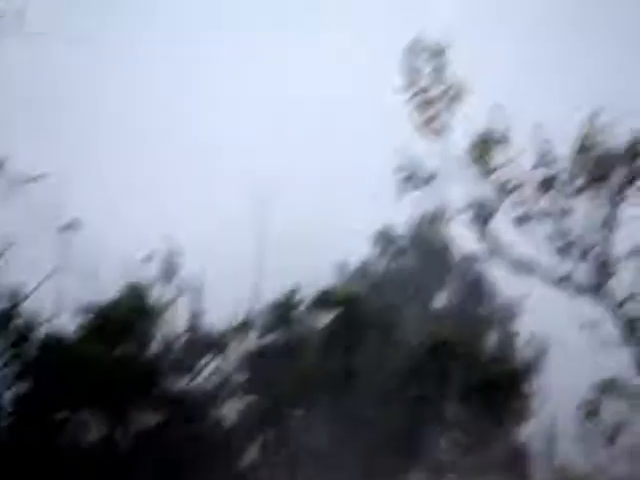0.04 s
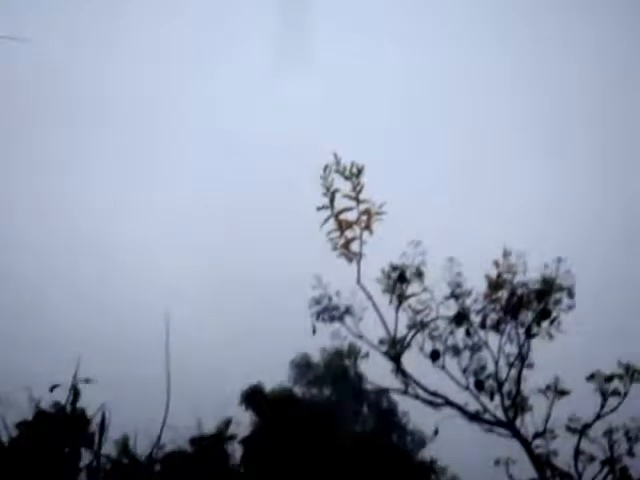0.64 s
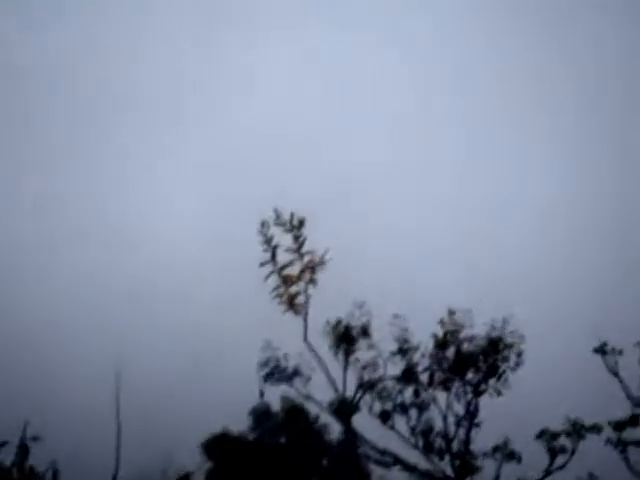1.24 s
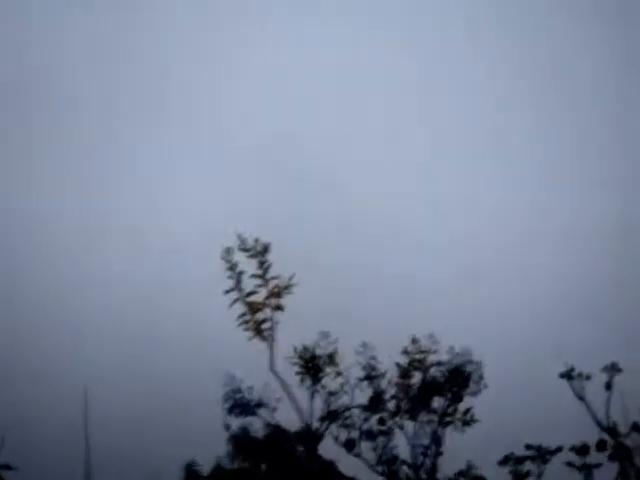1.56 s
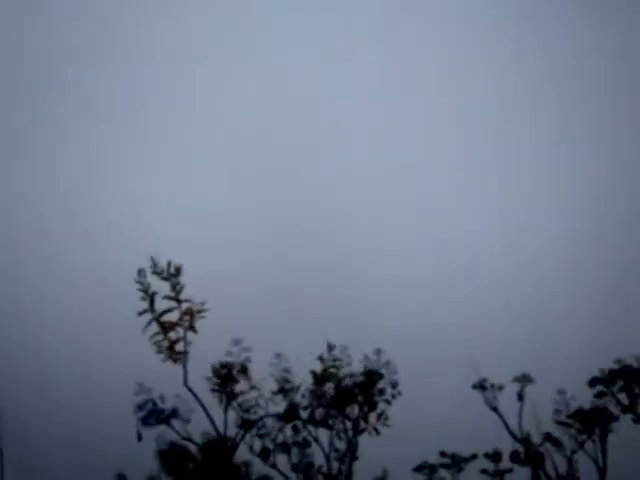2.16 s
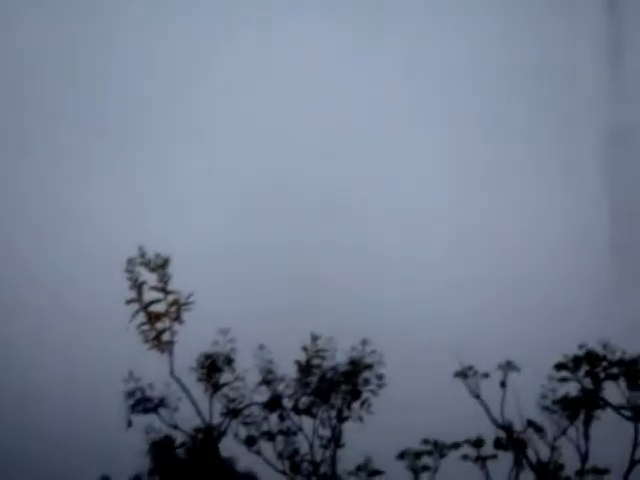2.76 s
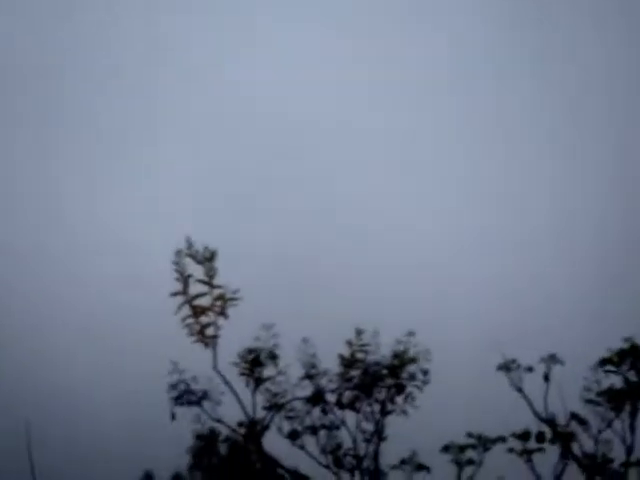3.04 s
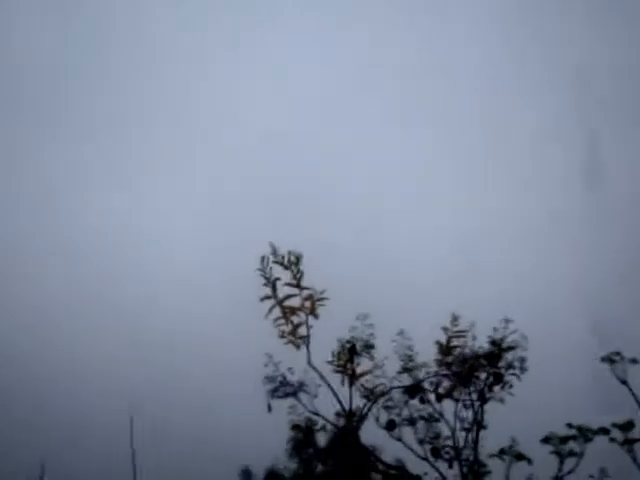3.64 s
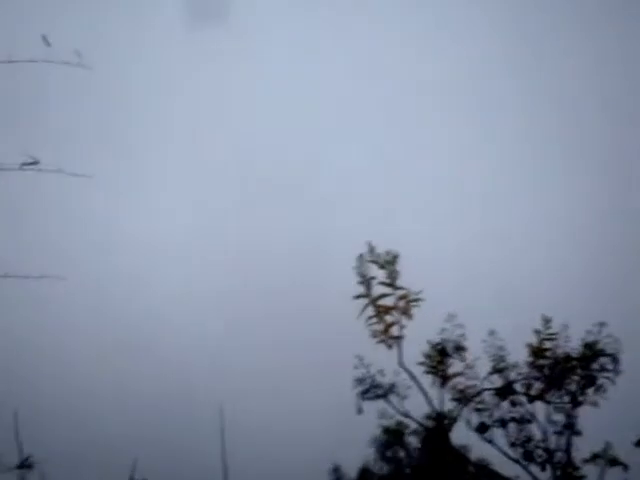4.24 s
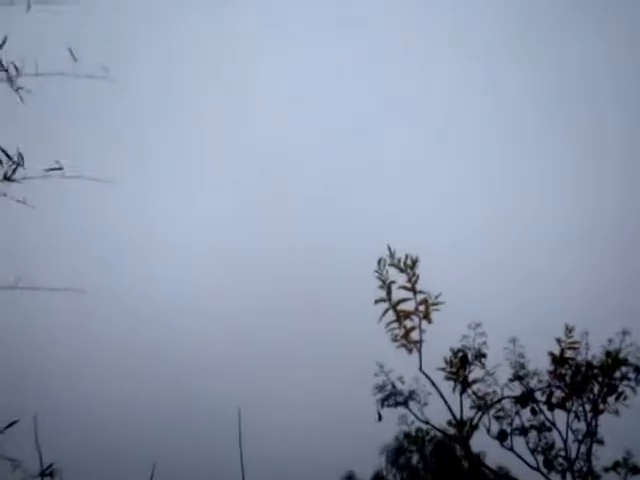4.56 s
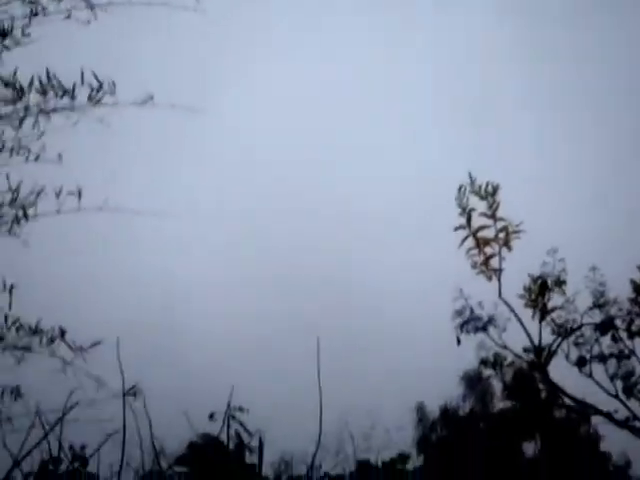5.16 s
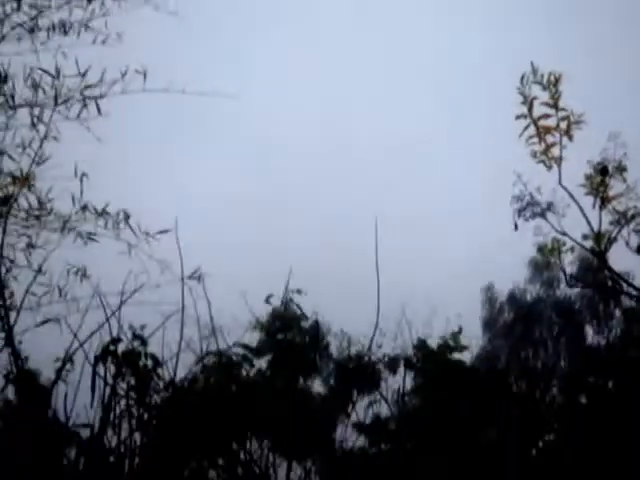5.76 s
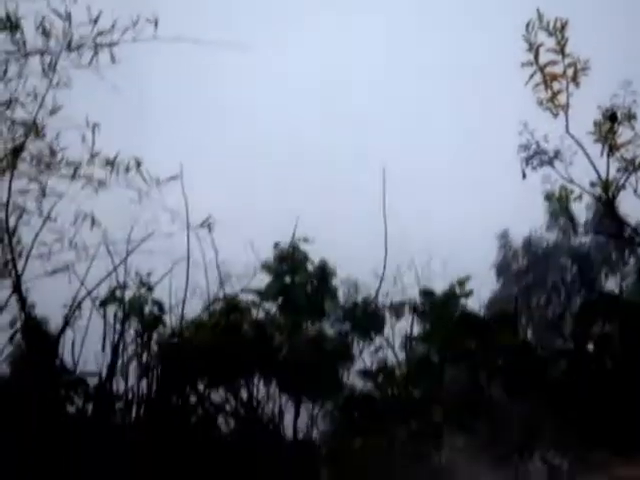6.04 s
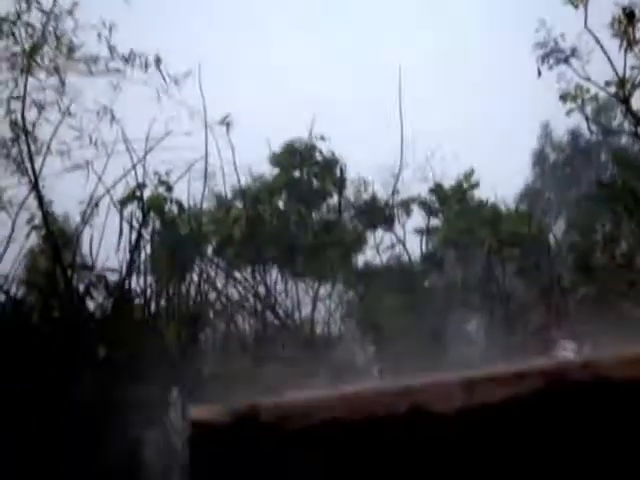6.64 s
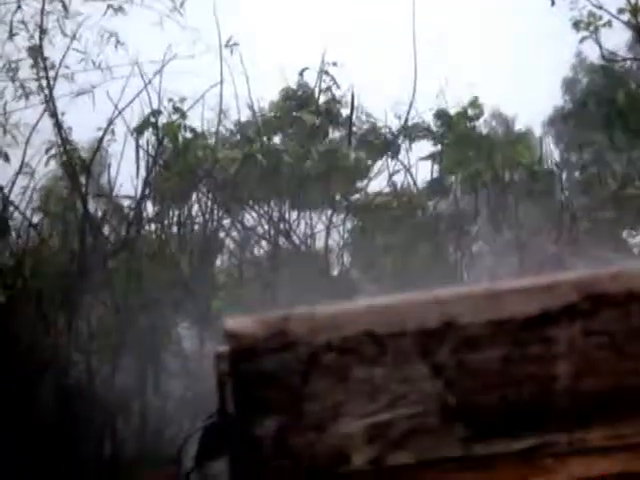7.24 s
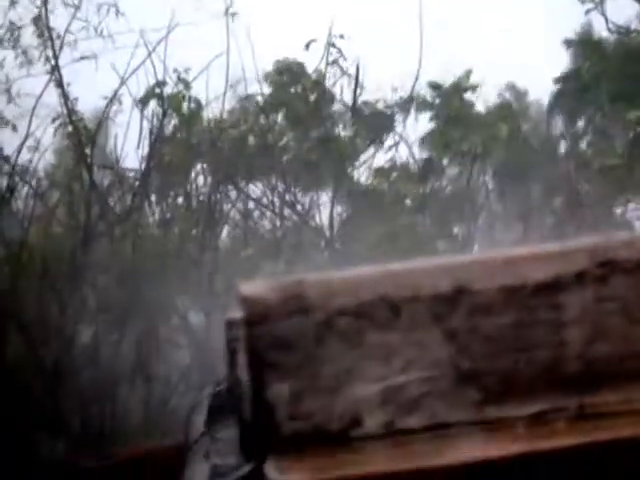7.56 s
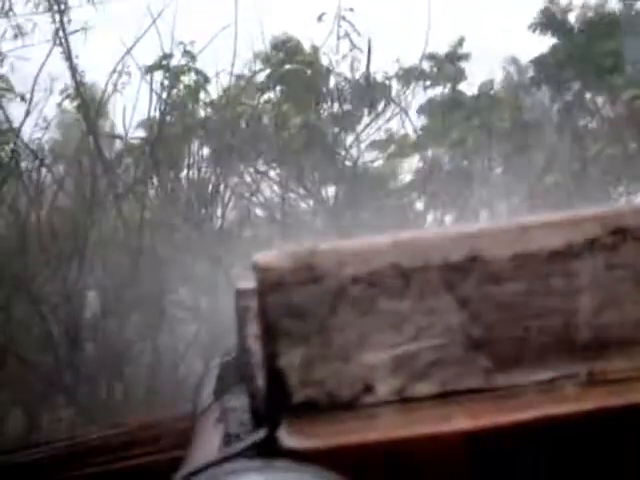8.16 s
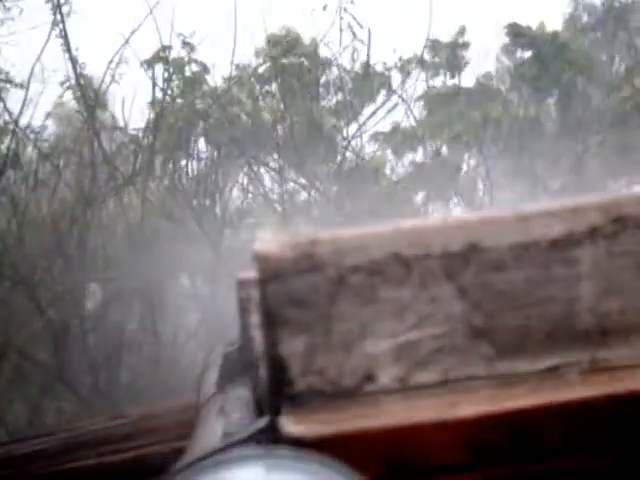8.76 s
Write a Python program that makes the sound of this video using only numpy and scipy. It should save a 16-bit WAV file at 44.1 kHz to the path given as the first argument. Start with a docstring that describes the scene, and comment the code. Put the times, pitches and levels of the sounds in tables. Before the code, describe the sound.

Heavy rain drums on a roof overhead, with close drips spattering on stone and a low rumble like distant thunder.

```python
"""Under the edge of a roof, in a heavy downpour. Thousands of drops drum on the roofing, with brief
low thuds standing out, while water spatters and drips on the masonry close by and clinks on a tile.
A low rumble, like far thunder, swells in the first second and dies away in weaker rolls.
Around five seconds the microphone tilts down and the drumming shifts colour; near seven a drop
knocks on its housing and a thin sizzle comes up for a second. Soft bumps and faint air lie beneath."""
import sys
import numpy as np
from scipy import signal
from scipy.fft import rfft, irfft
from scipy.io import wavfile

SR = 44100
rng = np.random.default_rng(int(sys.argv[2]) if len(sys.argv) > 2 else 0)


def generate_wav(signal):
    """Clip the signal to [-1, 1] and save it as 16-bit WAV at the path in sys.argv[1]."""
    frames = np.transpose(np.atleast_2d(signal))
    scaled = np.clip(frames, -1, 1) * 32767
    pcm = np.round(scaled).astype(np.int16)
    wavfile.write(sys.argv[1], SR, pcm)


N = 392490
TIME = np.arange(N) / SR
TOP_HZ = 10080  # upper band limit of the mix


def gain_of(db):
    """Decibels to amplitude."""
    return 10 ** (np.asarray(db) / 20)


def unit_rms(x):
    """The signal scaled to an RMS of one."""
    return x / np.sqrt(np.mean(x ** 2) + 1e-20)


def add(mix, start_s, sound):
    """Lay a sound into the mix."""
    part = mix[max(round(start_s * SR), 0):][:len(sound)]
    part += sound[:len(part)]


def band(x, lo_hz, hi_hz, order=2):
    """Butterworth band-pass."""
    sos = signal.butter(order, [lo_hz, min(hi_hz, .45 * SR)], "band", fs=SR, output="sos")
    return signal.sosfilt(sos, x)


def response(spectrum, size=8192):
    """The ring of a struck body with this spectrum of (Hz, dB) points, at unit energy."""
    hz, db = np.transpose(spectrum)
    grid_hz = np.fft.rfftfreq(size, 1 / SR)
    log_gain = np.log(gain_of(np.interp(np.log(grid_hz + 1), np.log(hz + 1), db)))
    mirrored = np.concatenate([log_gain, log_gain[-2:0:-1]])
    minimum_phase = np.exp(np.conj(signal.hilbert(mirrored)))
    ring = np.fft.ifft(minimum_phase).real[:size // 2]
    return ring / np.linalg.norm(ring)


def colour(x, spectrum):
    """Play a signal through a body with this spectrum."""
    return signal.oaconvolve(x, response(spectrum))[:N]


def flutter(rate_hz):
    """A smooth random wobble at unit RMS, rolling off around the given rate."""
    hz = np.fft.rfftfreq(N, 1 / SR)
    return unit_rms(irfft(rfft(rng.standard_normal(N)) * np.exp(-(hz / rate_hz) ** 2), N))


def impacts(per_s, spread_db, cap):
    """Clicks at random moments, many small and few large, spanning cap times spread_db."""
    size = gain_of(spread_db * np.minimum(rng.exponential(1, N), cap))
    return unit_rms(size * rng.choice([-1, 1], N) * (rng.random(N) < per_s / SR))


# The microphone's move. Each row: time in seconds, tilt from 0 (up) to 1 (down).
TILT_PATH = [(0, 0.13), (1.5, 0.029), (4.3, 0.34), (5.2, 0.78), (6.1, 0.63), (8.9, 0.95)]
def tilt():
    """How far down the microphone faces, gliding from point to point."""
    return np.interp(TIME, *np.transpose(TILT_PATH))


# Brief swells and dips in the drumming's loudness, with a short duck after the knock.
# Each row: centre in seconds, length in seconds, boost or cut in dB.
DRUMMING_SWELLS = [(0.275, 0.088, 1), (0.833, 0.29, 1), (1.315, 0.17, -2), (1.493, 0.45, 1),
                   (1.73, 0.21, -1.5), (2.654, 0.4, 0.1), (2.885, .16, -1.5), (3.146, 0.2, 2),
                   (3.76, .14, 0.2), (4.12, 0.42, 0.5), (4.624, 0.26, 1.2), (4.83, 0.2, -1),
                   (5.076, 0.33, -0.5), (5.286, 0.25, 1.1), (5.64, 0.57, 1), (6.084, 0.34, 1.5),
                   (6.268, .15, -1.7), (6.762, 0.18, 0.5), (6.858, 0.072, -4), (7.288, 0.3, 1.5)]
def swells():
    """A level ride in dB for the drumming: each swell or dip comes and goes smoothly."""
    return sum(db * np.cos(np.pi * np.clip((TIME - centre_s) / length_s, -.5, .5)) ** 2
               for centre_s, length_s, db in DRUMMING_SWELLS)


# The roofing's tone, microphone up and microphone down. Each row: frequency in Hz, level in dB.
ROOF_TONE_UP = [(65, -39.5), (110, -20.5), (228, -16.5), (263, -8.5), (285, -11), (348, -6), (430, -3.5),
                (553, 0), (615, -4.5), (701, -3), (801, -8), (1260, -13), (1470, -21), (1640, -22),
                (2600, -37.5), (3380, -68.5), (5720, -120)]
ROOF_TONE_DOWN = [(65, -53), (110, -23.5), (140, -21.5), (173, -15), (225, -17.5), (267, -8), (293, -9.5),
                  (413, -1.5), (575, 1), (606, -1.5), (951, -3), (1130, -8.5), (1320, -17), (1790, -19.5),
                  (2600, -35.5), (3380, -70), (5720, -120)]
def drumming(level_db=-16, tilt_db=-0.83, near_db=-3, flutter_db=0.56):
    """Near drops and a wash of far ones ring the roofing; its tone crossfades with the tilt."""
    far = rng.standard_normal(N)
    hits = far + gain_of(near_db) * impacts(per_s=1500, spread_db=3.0, cap=3.7)
    down = tilt()
    roof = (1 - down) * colour(hits, ROOF_TONE_UP) + down * colour(hits, ROOF_TONE_DOWN)
    ride_db = level_db + tilt_db * down + swells() + flutter_db * flutter(rate_hz=16)
    return gain_of(ride_db) * unit_rms(roof)


# Brief low thuds that stand out of the drumming. Each row: crest in seconds, level in dB, pitch in Hz.
THUDS = [(0.282, -7, 560), (0.84, -2.5, 523), (0.883, -2, 523), (1.233, -5.5, 560), (1.440, -7, 560),
         (1.475, -3.5, 560), (1.817, -3.5, 600), (1.905, -2, 584), (1.930, -3.5, 520), (2.577, -0.5, 556),
         (2.763, -0.5, 543), (2.983, -5.5, 560), (3.098, -4, 560), (3.488, -2.5, 560), (3.575, -2.5, 560),
         (3.895, -4.5, 540), (3.985, -5, 560), (4.67, -5, 580), (5.904, -6, 580), (6.174, -1, 600),
         (6.708, -6, 640), (6.876, -11, 600), (7.289, -5, 600), (7.321, -5, 600), (7.771, -12, 680),
         (7.840, -13, 640), (8.162, -7, 640)]
def thuds(rise_s=0.00085, decay_s=0.0011):
    """Each thud is a short swell, a few cycles long, at its own pitch."""
    out = np.zeros(N)
    t = np.arange(-SR // 100, SR // 100) / SR
    swell = 2 / (np.exp(-t / rise_s) + np.exp(t / decay_s))
    for crest_s, db, hz in THUDS:
        add(out, crest_s + t[0], gain_of(db) * swell * np.cos(2 * np.pi * hz * t))
    return out


# The bright tone of water on wet stone and leaves. Each row: frequency in Hz, level in dB.
SPATTER_TONE = [(1290, -31.5), (2200, -11), (2450, -5), (2730, -1.5), (3560, -3.5), (4090, -11), (4770, -9),
                (5910, -14), (6790, -13.5), (9630, -21), (10000, -23), (13000, -51), (22000, -120)]
def spatter(level_db=-43, tilt_db=-0.26, duck_db=-1.3, tick_db=-7, spray_db=-5, spray_s=0.0052):
    """Far hiss, fine ticks and splashes that throw a short spray; all dip a little while the sizzle sounds."""
    t = np.arange(SR // 8) / SR
    hiss = rng.standard_normal(N)
    water = hiss + gain_of(tick_db) * impacts(per_s=1400, spread_db=6.5, cap=3.94)
    for hz in np.geomspace(2600, 8500, num=5):  # smaller splashes sound higher
        splashes = impacts(per_s=55, spread_db=4.0, cap=1.8)
        spray_power = signal.oaconvolve(splashes ** 2, np.exp(-t / spray_s))[:N]
        droplets = impacts(per_s=7600, spread_db=1, cap=2.8)
        spray = unit_rms(np.sqrt(abs(spray_power)) * droplets)
        water += gain_of(spray_db) * band(spray, hz / 1.22, hz * 1.5, order=1)
    ride_db = level_db + tilt_db * tilt() + duck_db * sizzle_envelope()
    flicker_db = 0.5 * flutter(rate_hz=29)
    return gain_of(ride_db + flicker_db) * unit_rms(colour(water, SPATTER_TONE))


# Close drips on stone. Each row: start in seconds, peak in dB, pitch in Hz, width of the band
# in octaves, spray against the smack in dB.
STONE_DRIPS = [(0.152, -21, 2300, 0.3, -13), (0.759, -31, 5600, .5, -11), (0.875, -33, 4000, .5, -8),
               (1.210, -34, 4800, .25, -9), (1.353, -32, 3800, .5, -9), (1.427, -24, 2800, 0.61, -19),
               (1.755, -30, 3100, .3, -12), (1.969, -32, 3800, .35, -12), (2.063, -28, 3040, 0.2, -11),
               (2.111, -24, 3900, 0.39, -10), (2.211, -30, 3500, .4, -14), (2.506, -35, 4900, .2, -15),
               (2.711, -23, 2700, 0.48, -6), (3.049, -30, 4900, .25, -11), (3.122, -30, 3000, .25, -12),
               (3.143, -35, 6000, .4, -8), (3.724, -32, 7000, 0.4, -12), (4.273, -25, 3200, 0.5, -10),
               (4.375, -33, 5300, .35, -13), (4.523, -35, 7300, .3, -12), (5.118, -29, 3600, 0.5, -11),
               (5.353, -31, 3000, .2, -12), (5.636, -26, 7700, 0.35, -22), (5.765, -24, 2300, 0.63, -16),
               (6.443, -33, 4800, .2, -13), (6.650, -29, 3100, .25, -13), (7.781, -26.5, 3800, 0.52, -6),
               (7.855, -32, 5400, .35, -13), (7.966, -29, 3000, .25, -13), (8.092, -32, 5140, 0.4, -9),
               (8.184, -35, 7500, .3, -11), (8.468, -30, 3600, 0.55, -10), (8.487, -34, 6300, .35, -12),
               (8.735, -32, 5000, .35, -10), (8.748, -32, 4500, .5, -11)]
def drips(smack_s=0.0009, spray_s=0.013):
    """A sharp smack on stone, then the fall of its spray; each drip has its own pitch."""
    out = np.zeros(N)
    t = np.arange(SR // 8) / SR
    grid_hz = np.fft.rfftfreq(128, 1 / SR)[1:]
    for start_s, db, hz, octaves, spray_db in STONE_DRIPS:
        smack, spray = rng.standard_normal((2, len(t)))
        burst = smack * np.exp(-t / smack_s) + gain_of(spray_db) * spray * np.exp(-t / spray_s)
        hump_db = np.maximum(-2.2 * (np.log2(grid_hz / hz) / octaves) ** 2, -50)
        splash = signal.fftconvolve(burst, response(np.column_stack([grid_hz, hump_db]), size=1024))
        add(out, start_s, gain_of(db) * splash / abs(splash).max())
    return out


# The modes of something hard, like a tile. Each row: frequency in Hz, level in dB, T60 in seconds.
TILE_MODES = [(3100, -7, .009), (3570, 0, .010), (4600, -4, .011), (5100, -5, .009), (6750, -20, .008),
              (8100, -23, .007)]
# Drops that ring it. Each row: start in seconds, peak in dB, brightness in dB per octave,
# pitch ratio, ring length ratio.
TILE_HITS = [(1.814, -17.5, -1, 0.95, 1.0), (1.8167, -29, -5, .94, 1.0), (2.2862, -22, 8, .95, .55),
             (4.2735, -27, 5, 0.97, 1.3), (7.620, -28, -30, .92, 1.6), (7.631, -28, -30, .92, 1.6),
             (7.782, -29, -30, .88, 1.5), (7.7855, -25, -8, .92, 1.2)]
def clinks(attack_s=0.00026):
    """A drop sets off all the tile's modes together; each spot has its pitch, and a wet one rings less."""
    out = np.zeros(N)
    t = np.arange(SR // 20) / SR
    lowest_hz = TILE_MODES[0][0]
    for start_s, db, brightness, pitch, length in TILE_HITS:
        ring = np.zeros(len(t))
        for hz, mode_db, t60 in TILE_MODES:
            envelope_db = mode_db + brightness * np.log2(hz / lowest_hz) - 60 * t / (t60 * length)
            ring += gain_of(envelope_db) * np.sin(2 * np.pi * hz * pitch * t)
        ring *= 1 - np.exp(-t / attack_s)
        add(out, start_s, gain_of(db) * ring / abs(ring).max())
    return out


# The knock of the microphone's housing. Each row: frequency in Hz, level in dB.
HOUSING_TONE = [(40, -34), (80, -18), (140, -4), (330, -5), (520, 4), (750, -4), (1200, -13), (1700, -7),
                (2700, -14), (4000, -21), (5300, -27), (6500, -45), (10000, -60)]
def housing_tap(start_s=6.8414, knock_db=-0.3, push_s=.0007, rebound_db=-6, rebound_hz=450):
    """One drop strikes the housing: a sudden push, then a rebound that dies in a swing or two."""
    out = np.zeros(N)
    t = np.arange(SR // 20) / SR
    knock = response(HOUSING_TONE)
    rebound = np.sin(2 * np.pi * rebound_hz * t) * np.exp(-t / .0013)
    add(out, start_s, -gain_of(knock_db) * knock / abs(knock).max())
    add(out, start_s + push_s, gain_of(rebound_db) * band(rebound, 160, TOP_HZ))
    return out


# The dark tone of the rumble. Each row: frequency in Hz, level in dB.
RUMBLE_TONE = [(20, -36), (45, -27), (70, -17), (125, -10.5), (175, 1), (240, -0.5), (320, 0), (460, -8.5),
               (800, -62)]
# Its rolls. Each row: crest in seconds, level of the shocks in dB, level of the boom in dB.
RUMBLE_ROLLS = [(.48, -30, -32.5), (.8, -24, -37), (1.08, -21.5, -31), (1.4, -29, -47), (2.4, -32, -39.5),
                (3.09, -27.5, -38.5), (3.33, -34.5, -43), (4.9, -31.5, -44.5)]
def rumble(rise_s=0.2, decay_s=0.3):
    """Dense low shocks, blurred by distance, and a hollow boom roll together over a fading murmur."""
    shocks = unit_rms(colour(impacts(per_s=700, spread_db=3.0, cap=2.5), RUMBLE_TONE))
    boom = unit_rms(band(rng.standard_normal(N), lo_hz=100, hi_hz=126))
    shock_gain = gain_of(-39 - 0.13 * TIME)  # the murmur under the rolls
    boom_gain = gain_of(-43.5 - 2.5 * TIME)
    for crest_s, shock_db, boom_db in RUMBLE_ROLLS:
        swell = np.exp(-np.maximum((crest_s - TIME) / rise_s, (TIME - crest_s) / decay_s))
        shock_gain = np.hypot(shock_gain, gain_of(shock_db) * swell)  # rolls add in power
        boom_gain = np.hypot(boom_gain, gain_of(boom_db) * swell)
    return shock_gain * shocks + boom_gain * boom


# Soft low bumps. Each row: crest in seconds, level in dB, half-width in seconds, pitch in Hz.
LOW_BUMPS = [(2.437, -37, .05, 112), (4.92, -34, .03, 140), (8.392, -40, .025, 90)]
def bumps(band_ratio=1.32):
    """Brief swells of low turbulence, perhaps puffs of wind on the microphone."""
    out = np.zeros(N)
    for crest_s, db, half_width_s, hz in LOW_BUMPS:
        swell = np.exp(-((TIME - crest_s) / half_width_s) ** 2)
        turbulence = unit_rms(band(rng.standard_normal(N), hz / band_ratio, hz * band_ratio))
        out += gain_of(db) * swell * turbulence
    return out


def sizzle_envelope(start_s=6.78, rise_s=0.081, hold_s=0.87, fade_s=.4):
    """The sizzle's fader, from 0 up to 1 and back."""
    return np.interp(TIME, start_s + np.cumsum([0, rise_s, hold_s, fade_s]), [0, 1, 1, 0])


def sizzle(level_db=-58.3, flicker_db=1):
    """A thin, high band of fine crackle that flickers for about a second."""
    crackle = band(impacts(per_s=1800, spread_db=1.5, cap=3), lo_hz=8300, hi_hz=9000, order=1)
    flicker = gain_of(flicker_db * flutter(rate_hz=20))
    return gain_of(level_db) * sizzle_envelope() * unit_rms(crackle * flicker)


def air(level_db=-57):
    """The faint low rush of moving air."""
    return gain_of(level_db) * unit_rms(band(rng.standard_normal(N), lo_hz=35, hi_hz=110, order=1))


def scene():
    """The rain and its background, mixed to mono."""
    rain = drumming() + thuds() + spatter() + drips() + clinks() + housing_tap()
    return (rain + rumble() + bumps() + air() + sizzle())[None]


def record(dry):
    """A soft clip rounds the largest peaks; a steep low-pass takes off the top."""
    rounded = dry / (1 + dry ** 8) ** (1 / 8)
    lowpass = signal.firwin(1023, TOP_HZ, window=("kaiser", 9), fs=SR)
    return signal.oaconvolve(rounded, lowpass[None], "same")


dry = scene()
out = record(dry)
generate_wav(out)
```